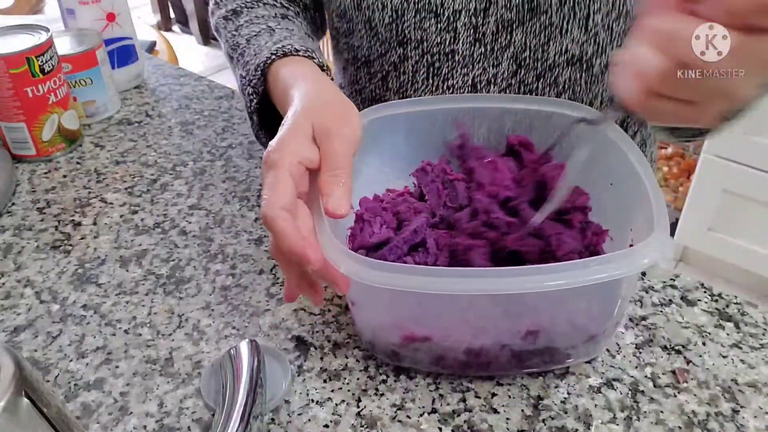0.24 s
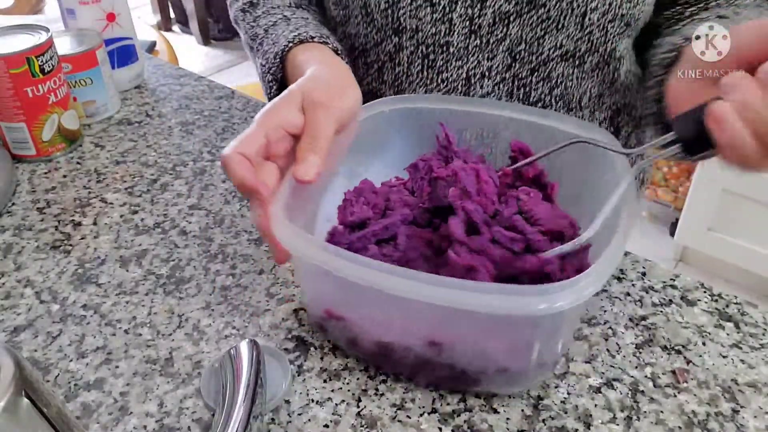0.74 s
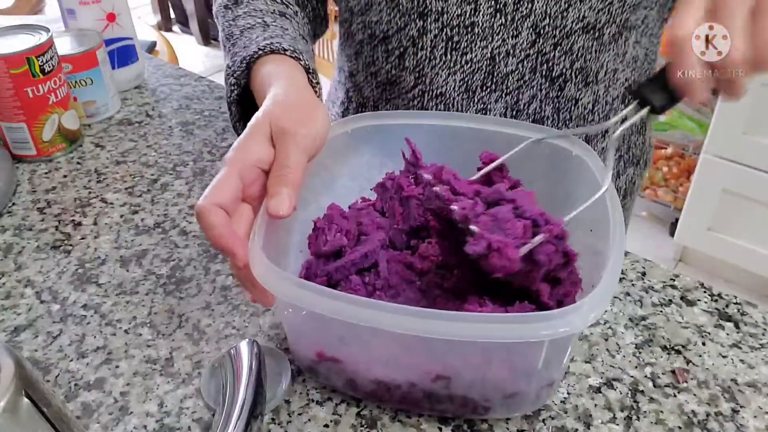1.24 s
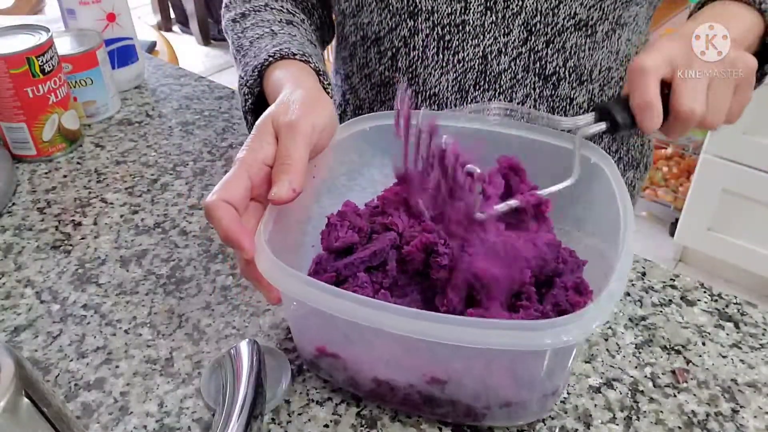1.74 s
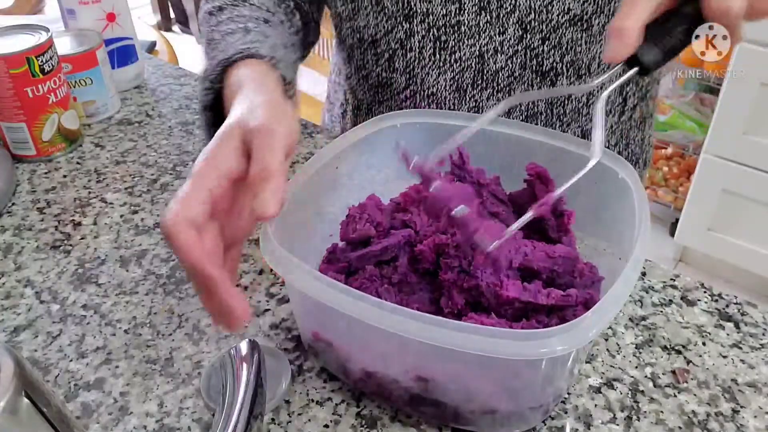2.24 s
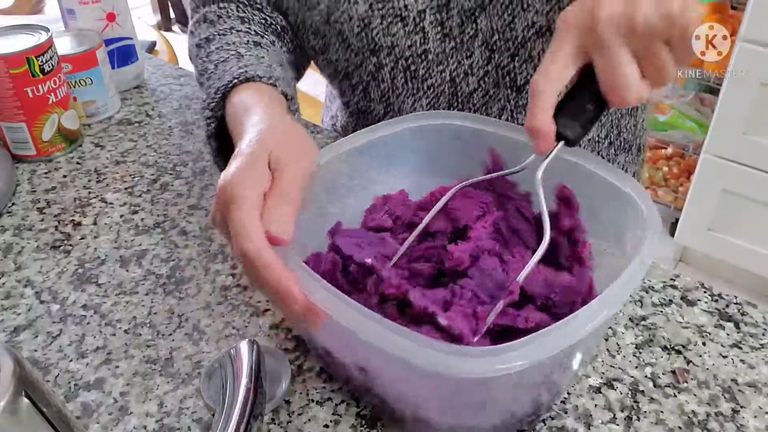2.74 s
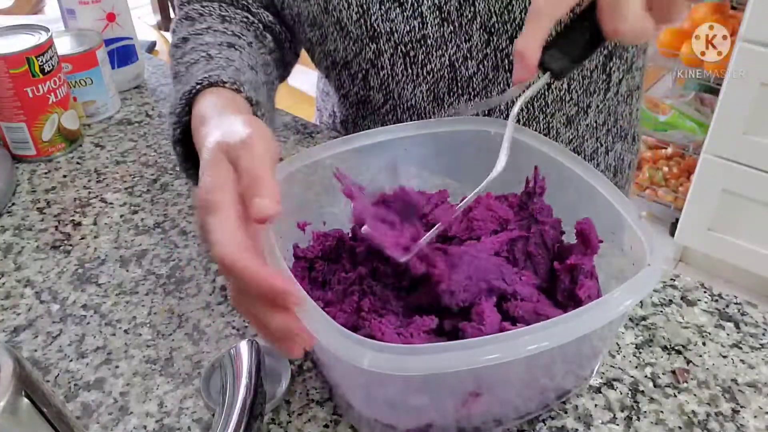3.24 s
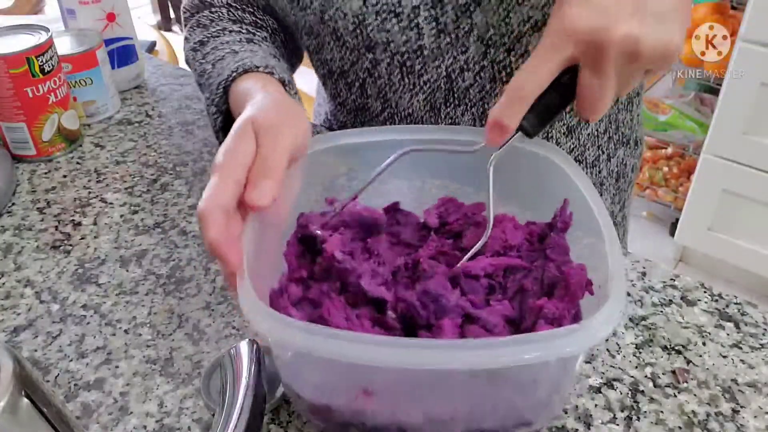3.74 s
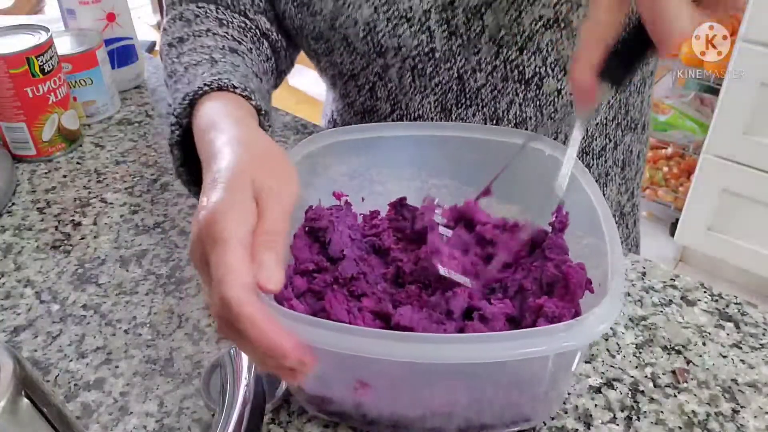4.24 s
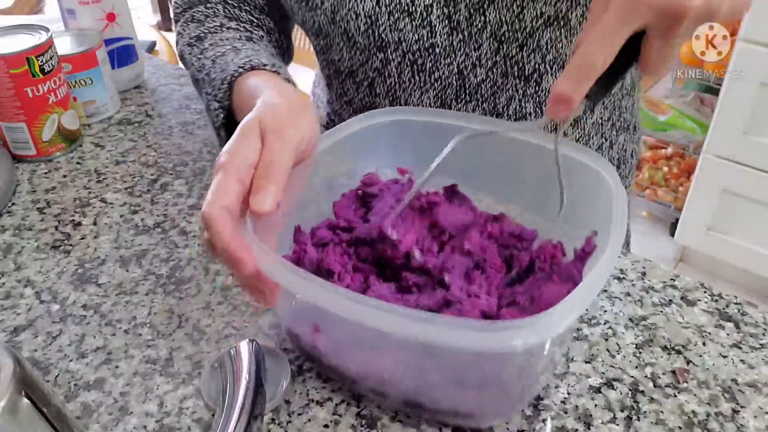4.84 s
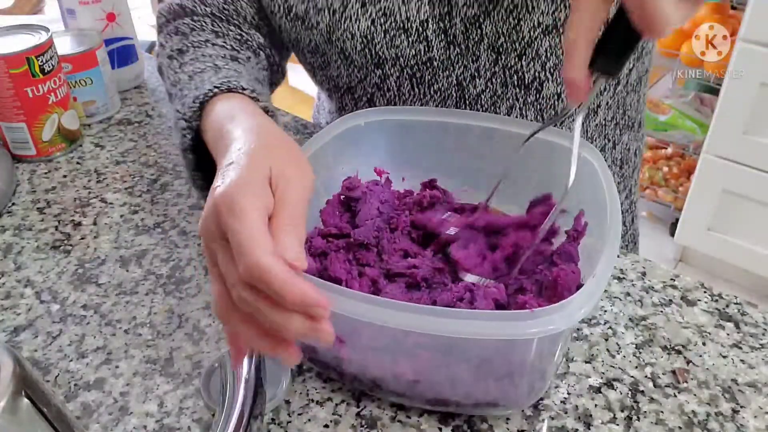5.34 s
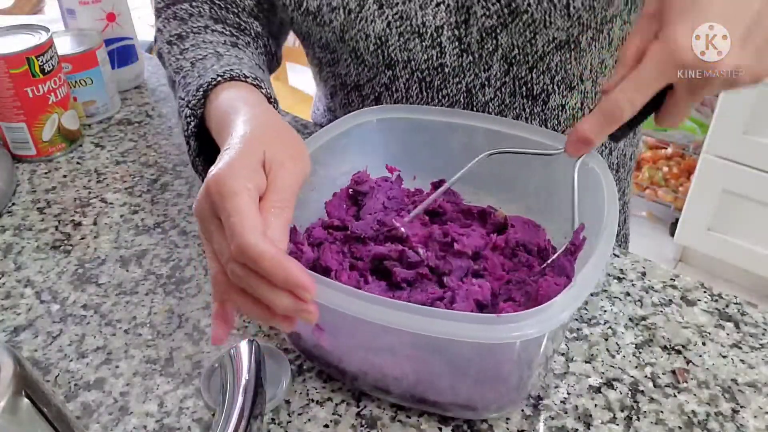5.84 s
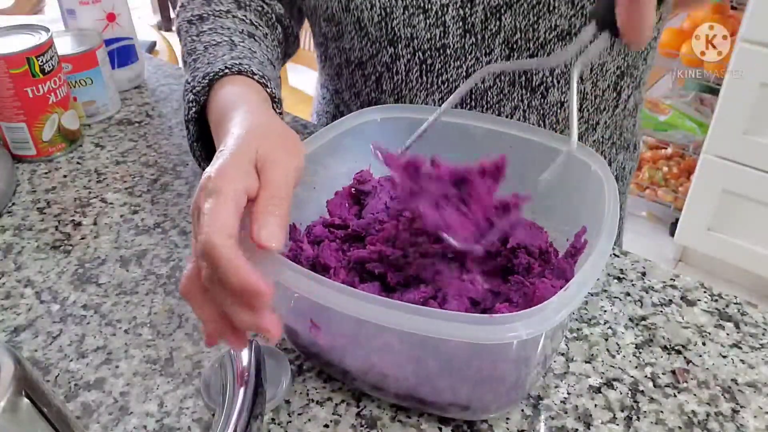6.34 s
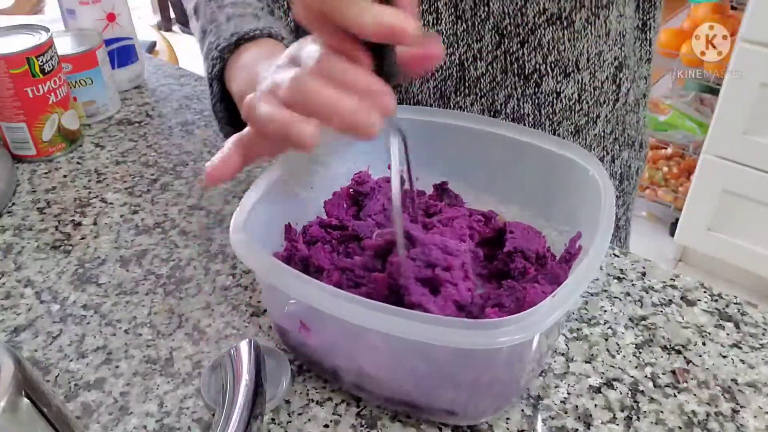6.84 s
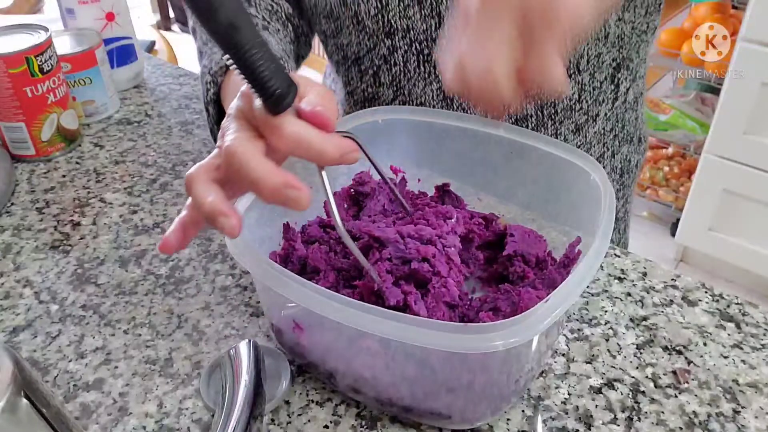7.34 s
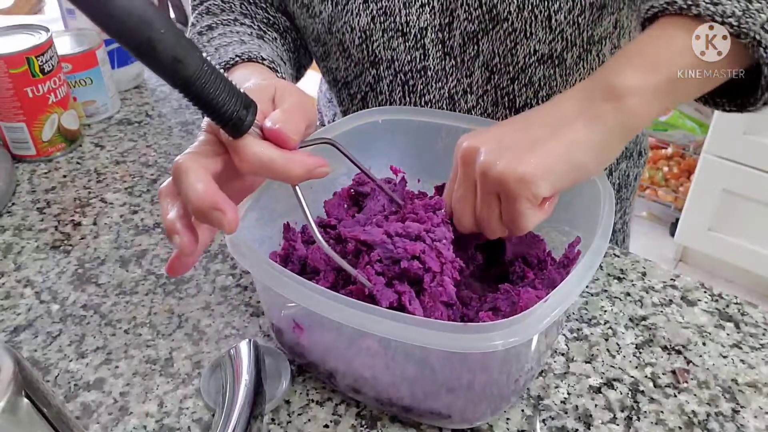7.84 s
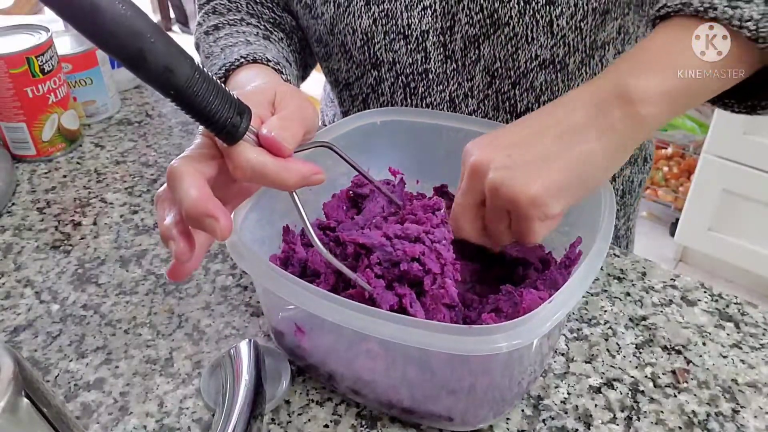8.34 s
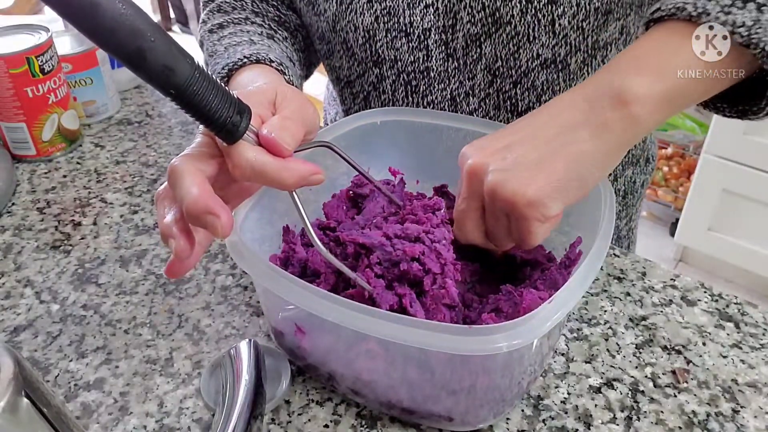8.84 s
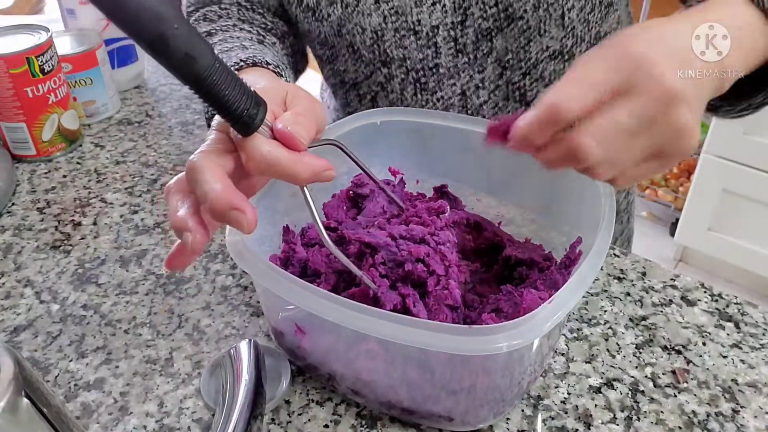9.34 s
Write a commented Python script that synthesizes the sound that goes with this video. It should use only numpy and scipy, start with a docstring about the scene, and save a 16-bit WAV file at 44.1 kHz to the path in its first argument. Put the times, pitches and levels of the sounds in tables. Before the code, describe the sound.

A wire masher scrapes and squashes sticky mash in a plastic tub, with hollow knocks on a stone counter, then thins to near quiet.

```python
"""Scrapes, wet squashes and hollow knocks: a wire masher works soft yam in a plastic tub on a stone counter.
Friction and sticky hiss are shaped noise that swells with each stroke; wet ticks are brief noise bursts.
Knocks excite decaying modes of the tub walls, the air in the tub and the counter, heard close to a phone.
Behind lie the reverberation, air and hum of a quiet kitchen, and a faint dull tock once a second."""
import sys
import numpy as np
from scipy import signal
from scipy.fft import rfft, irfft, next_fast_len
from scipy.io import wavfile
from scipy.ndimage import uniform_filter1d

SR = 44100
rng = np.random.default_rng(int(sys.argv[2]) if len(sys.argv) > 2 else 0)


def int16_out(signal):
    """Quantize to a 16-bit WAV file."""
    q = np.round(np.clip(np.atleast_2d(signal).T, -1, 1) * 32767)
    wavfile.write(sys.argv[1], SR, q.astype(np.int16))


N = 422478  # length in samples

# modes of the tub walls, damped by mash and hand: pitch_hz, relative level_db, t60_s
TUB_MODES = [(312, -18, 0.065), (450, -11, 0.026), (527.3, -5.5, 0.03), (715, -5, 0.013),
             (729.5, -2.5, 0.033), (851.7, -5.5, 0.024), (1101, -4, 0.1), (1256, 1.5, 0.011),
             (1757, -13, 0.041), (1970, -11.5, 0.079), (2240, -8, 0.043), (2480, -10, 0.025),
             (2820, -11.5, .025), (3100, -12.5, .025), (4330, -21.5, .02)]


def gain_of(db):
    """Level to amplitude: 20 dB is a factor of ten."""
    return 10 ** (np.asarray(db) / 20)


def evened(x):
    """Normalization by mean power: the result has rms 1."""
    return x / np.sqrt(np.mean(x ** 2) + 1e-20)


def read(points, hz):
    """Interpolation of a spectrum on a log-frequency axis, close to the ear's own scale."""
    point_hz, value = np.transpose(points)
    return np.interp(np.log(hz + 1), np.log(point_hz + 1), value)


def add(mix, s, sound, pan_db):
    """Superposition in the stereo pair, placed by level difference: positive pan_db favours the left."""
    part = mix[:, round(s * SR):][:, :sound.shape[-1]]
    part += sound[..., :part.shape[1]] * gain_of([[pan_db / 2], [-pan_db / 2]])


def noise(shape, patchy_db, flicker_db, size, count):
    """Random-phase synthesis: partly coherent stereo noise with lasting patches and a flicker of all bins."""
    # likeness of the two channels: pitch_hz, coherence (0 to 1)
    likeness = [(60, 0.93), (150, 1), (300, 0.9), (1000, 0.25), (4000, 0.13), (15000, 0.21)]
    # channel balance: pitch_hz, left_over_right_db
    balance = [(60, -3.5), (180, 5), (550, -3.5), (1650, 1), (4970, 0.5), (15000, 3)]
    frames, hz = N * 4 // size + 5, np.fft.rfftfreq(size, 1 / SR)
    a, b, c, d, patches = rng.standard_normal((frames, len(hz), 5)).T
    patches = uniform_filter1d(patches, size=3, axis=0)  # 3 bins wide
    patches = evened(uniform_filter1d(patches, size=count, axis=1))  # count frames long
    flicker = evened(uniform_filter1d(rng.standard_normal(frames), size=3))
    same = np.clip(read(likeness, hz), -1, 1)[:, None]
    left = a + 1j * b
    right = same * left + np.sqrt(1 - same ** 2) * (c + 1j * d)
    z = np.array([left, right])
    z *= gain_of(np.array([.5, -.5])[:, None, None] * read(balance, hz)[:, None])
    z *= gain_of(read(shape, hz)[:, None] + patchy_db * patches + flicker_db * flicker)
    x = signal.istft(z, nperseg=size, noverlap=size * 3 // 4)[1][:, :N]
    return x / np.sqrt(np.mean(x.mean(0) ** 2))


def ring(hz, db, t60, detune, scatter_db, rise_s):
    """Modal decay: dying sines, each shifted a little at random in pitch and level."""
    t = np.arange(SR // 3)[:, None] / SR
    shift, size = rng.standard_normal((2, len(hz)))
    decay = gain_of(db + scatter_db * size - 60 * t / t60)
    modes = decay * np.sin(2 * np.pi * hz * (1 + detune * shift) * t)
    x = (modes * (1 - np.exp(-t / rise_s))).sum(1)
    return x / abs(x).max()


def strokes():
    """Friction noise: as each stroke swells, holds and dies, every rubbing part follows at its own level."""
    # strokes through the mash: full_pressure_s, rise_s (over 30 dB, sign ignored), hold_s, fall_s (likewise),
    # wire rub_db, bright_over_rub_db, tub hollow_db, tub drag_db, mash hiss_db
    stroke_rows = [(0.037, 12, .14, 0.15, -57.5, -2, -64, -62.5, -59),
                   (0.37, 4, 0.1, 2, -86, 9, -82, -75.5, -68),
                   (0.533, 0.18, .27, 0.16, -60.5, 2, -63, -66.5, -60.5),
                   (0.939, 0.43, 0.23, 0.08, -62, 0.8, -64.5, -61.5, -63),
                   (1.403, 0.2, .11, 0.1148, -57, 0, -52, -48, -61),
                   (1.82, -0.01, .11, 0.24, -51, -4.5, -47, -49.5, -67),
                   (2.091, 0.28, 0.048, 0.21, -74.5, 4, -69, -63.5, -67),
                   (2.632, 0.3, .01, 1.3, -94, 10, -87, -75, -68),
                   (2.676, 0.04, 0.22, -0.03, -57, 3.5, -58.5, -62.5, -50),
                   (2.914, 0.12, 0.11, 0.11, -52, 1.1, -53.5, -53.5, -52),
                   (3.096, 0.24, 0.011, 0.22, -67, 2.5, -66.5, -60, -66.5),
                   (3.434, 0.05, 0.079, 0.9, -70, 3.5, -71, -66, -64.5),
                   (3.646, 0.12, 0.083, 0.13, -56, 3.5, -53.5, -63, -52),
                   (3.729, 0.0239, .04, 0.17, -46.5, -1, -48.5, -64, -46),
                   (3.829, 0.09, 0.068, 0.11, -55, 1.5, -56.5, -58.5, -52),
                   (4.174, 0, 0.017, -0.1, -65, -15, -73, -67.5, -67),
                   (4.246, 0.08, .03, -0.2, -59.5, -2.5, -70, -54.5, -60.5),
                   (4.346, 0.16, 0.088, 0.14, -62, 2.5, -60, -64.5, -57),
                   (4.594, 0.24, 0.056, 0.49, -54.5, 1.5, -53, -63, -49),
                   (4.938, 0.43, 0.064, 0.25, -55, 2.2, -55.5, -58.5, -52.5),
                   (5.285, -0.02, 0.035, 0.2, -54, -4, -69, -46.5, -63),
                   (5.46, 0.24, 0.098, 0.52, -77.5, 9.5, -84, -71, -61),
                   (5.589, 0.1, 0.055, 0.17, -60, 5, -57.5, -64.5, -57.5),
                   (5.818, .05, 0.12, 0.36, -90, 13, -87, -86, -67.5),
                   (5.961, 0.06, 0.048, 0.34, -63, 3.5, -60.5, -54, -59),
                   (6.186, -2.4, .01, 0.2, -70, -5, -77, -66, -72.5),
                   (6.36, 2.5, .02, 0.23, -91.5, 6, -92.5, -78.5, -71.5),
                   (6.84, 0.36, .01, 0.95, -87, 5.5, -79.5, -65.5, -69),
                   (6.89, 0.09, 0.071, 0.21, -64.5, 4.5, -63.5, -64, -58),
                   (7.019, 0.13, 0.034, 0.12, -71, 2.5, -70, -79, -64.5),
                   (7.19, -0.6, 0.011, .11, -79, -6.5, -78, -73.5, -78.5),
                   (7.715, 0.14, 0.17, 0.4, -87.5, -0.3, -77, -72, -86),
                   (8.01, 0.1, .03, 0.12, -82.5, 4, -79, -82, -62.5),
                   (8.038, 0.05, 0.031, 0.33, -75.5, 7.5, -69, -73, -61.5),
                   (8.169, 0, 0.021, 0.1, -71, -9, -70.5, -78.5, -93),
                   (8.372, 0.16, 0.14, 0.53, -85, 1, -78.5, -67, -81.5),
                   (9.159, 0.25, 0.021, 0.16, -84.5, -1.5, -84, -74, -83),
                   (9.441, 0.12, .2, .1, -66, 6, -78.5, -73.5, -56)]
    # spectra, each: pitch_hz, relative density_db
    rub_shape = [(850, -37.5), (1450, -5), (1570, -0.5), (1700, -2.5), (1970, -1), (2260, -4), (2600, -9),
                 (3380, -37), (5720, -120)]  # wire rubbing the wall
    bright_shape = [(1530, -32), (2600, 2.5), (3920, 3), (4260, -2.5), (4640, 1.5), (5370, -8.5),
                    (6500, -6.5), (8450, -32.5), (14300, -120)]  # upper part of the rub
    hollow_shape = [(500, -44), (850, -9.5), (921, -14), (994, -5.5), (1070, 0), (1220, -5), (1300, -6),
                    (1450, -14), (1880, -44.5), (3190, -120)]  # hollow of the tub
    drag_shape = [(88, -34.5), (150, 0), (252, -6.5), (356, 1), (394, -8), (425, -7), (575, 4), (950, -11),
                  (1240, -40.5), (2090, -120)]  # tub dragged on the counter
    hiss_shape = [(1760, -31.5), (3000, -9.5), (3910, -9), (4260, -3.5), (6130, -2), (8340, -6),
                  (14900, -4), (15600, -20), (16000, -12)]  # sticky mash
    shake_shape = [(15, -42), (25, -20.5), (40, -2.5), (59, 2), (118, 3), (182, -9), (251, -11), (300, -8),
                   (390, -36), (660, -120)]  # counter shaken by the drag
    shake_over_drag_db = -0.5
    rest_drag_db, rest_shake_db = -78, -65  # low murmur and rumble that stay between strokes

    s, rise, hold, fall, rub_db, bright_db, *other_db = np.transpose(stroke_rows)
    t = np.arange(0, N + 96, 96)[:, None] / SR  # control points 96 samples apart
    before = np.maximum((s - t) / abs(rise), 0)
    after = np.maximum((t - s - hold) / abs(fall), 0)
    stroke_power = gain_of(-30 * (before + after)) ** 2
    part_power = gain_of([rub_db, rub_db + bright_db, *other_db]).T ** 2
    power = stroke_power @ part_power  # overlapping strokes add in power
    rub, bright, hollow, drag, hiss = (np.interp(np.arange(N) / SR, t[:, 0], np.sqrt(p)) for p in power.T)
    shake = np.hypot(gain_of(shake_over_drag_db) * drag, gain_of(rest_shake_db))
    drag = np.hypot(drag, gain_of(rest_drag_db))

    out = rub * noise(rub_shape, patchy_db=2.5, flicker_db=2.0, size=512, count=14)
    out += bright * noise(bright_shape, patchy_db=1.9, flicker_db=1.5, size=256, count=20)
    out *= grain(depth_db=0.85, count=90)
    out += hollow * noise(hollow_shape, patchy_db=1.0, flicker_db=0.8, size=512, count=20)
    out += drag * noise(drag_shape, patchy_db=3.5, flicker_db=1.2, size=512, count=12)
    hiss = hiss * grain(depth_db=1.26, count=50)
    out += hiss * noise(hiss_shape, patchy_db=1.5, flicker_db=0.9, size=128, count=40)
    return out + shake * noise(shake_shape, patchy_db=2.25, flicker_db=2.5, size=2048, count=5)


def grain(depth_db, count):
    """Intermittent yielding: brief surges as lumps of mash give way, smoothed over count samples."""
    surges = np.minimum(rng.exponential(1, N), 7) ** 3 - 6  # the cube makes large surges rare
    return gain_of(depth_db * evened(uniform_filter1d(surges, size=count)))


def knocks():
    """Impact excitation: a short push cracks and rings the walls, then clatter and the counter's boom follow."""
    # knocks: start_s, blow_db, boom_db, struck_centre_hz, clatter_db, clatter brightness_db_per_octave,
    # hollow_db, weight on the higher counter modes_db_per_octave, left_over_right_db (halved for clatter,
    # none for boom)
    knock_rows = [(0.241, -40, -75, 1140, -65, 4, -69, 0, 2),
                  (0.889, -35.5, -47, 486, -59.5, 3.5, -74, 1, 1),
                  (0.93, -42, -60, 720, -55.5, 4, -70, 2.5, 4),
                  (1.003, -42.5, -59, 740, -56, 2, -64, -6, 2.5),
                  (1.177, -39.5, -42, 743, -55.5, -2.5, -74, 0, -2.5),
                  (1.33, -46, -73, 1100, -56.5, -0.5, -51, 2.5, 6),
                  (1.426, -30.5, -43, 566, -53, 1.5, -64, 3, -1.5),
                  (1.457, -31.5, -53.5, 439, -50, 0, -50, 2, 3),
                  (1.498, -28, -45, 503, -55, -7, -56, 1.5, 1.5),
                  (1.81, -8, -16, 650, -26, -1.5, -22, -0.75, 2.5),
                  (2.535, -65, -47.5, 301, -78, -6, -98, 2.5, -3.5),
                  (2.912, -28.5, -39, 711, -44.5, 4, -51, 3.5, 0),
                  (2.949, -33.5, -57, 1090, -50, 1, -66, 11, -.6),
                  (3.092, -42.5, -57.5, 675, -63, 8, -74, -2, -2.5),
                  (3.416, -39.5, -46.5, 1070, -58, -8, -57, 2, .3),
                  (3.726, -29.5, -32.5, 740, -59.5, -5, -61, 8, 2.5),
                  (3.763, -41, -46, 1220, -52.5, 0, -64, 7, -1.5),
                  (3.827, -39.5, -55, 1860, -52.5, 3, -65, 5, 3),
                  (3.978, -45, -69, 686, -62, -6, -74, 6, .3),
                  (4.243, -32.5, -52.5, 568, -52.5, -2, -72, -3, -4),
                  (4.549, -53, -55, 1080, -53, 3.5, -54, -4, 3),
                  (4.943, -39, -64, 725, -66, -8, -57, -4, 0),
                  (5.288, -18, -39, 486, -43.5, 1, -62, -1, -1.5),
                  (5.304, -35, -29, 687, -47, -5, -59, 2.5, -1.5),
                  (5.95, -34, -44, 490, -54.5, -9, -67, 7, -2.5),
                  (6.79, -62, -58.5, 304, -80, -10, -87.5, 6, 1),
                  (6.836, -51, -57, 301, -56.5, -13, -64, 7, -1.5),
                  (6.924, -47, -63, 1080, -57, 3, -64, 4, -2.5),
                  (7.712, -41, -60.5, 725, -60, -2, -68, 2.5, 1.5),
                  (8.363, -37, -64, 730, -53, -5, -57, 5, 3.5)]
    # modes of slab and cabinet: pitch_hz, relative level_db, t60_s when unloaded
    counter_modes = [(55.5, -5, 0.65), (96.7, -1.5, 0.2), (172.4, -11.5, 0.29), (220, -18, 0.092)]
    # modes of the air in the tub: pitch_hz, relative level_db, t60_s
    cavity_modes = [(1024, -6, 0.16), (1080, -3.5, 0.27), (1159, 1, 0.18), (1187, -3.5, .22),
                    (1248, -4, .2), (1262, -6.5, 0.24)]
    contact_ms, boom_delay_s = 0.43, .009
    boom_share = .66  # the loaded counter rings this share of its free decay
    crack_per_db, crack_db = 1.3, 3  # harder blows crack more

    out, t = np.zeros((2, N)), np.arange(400) / SR
    hz, db, t60 = np.transpose(TUB_MODES)
    low_hz, low_db, low_t60 = np.transpose(counter_modes)
    push = np.exp(-.5 * (3.7 * (t * 1000 - 1.6) / contact_ms) ** 2)  # bell-shaped, peak at 1.6 ms
    crack = np.gradient(np.gradient(push))
    crack /= abs(crack).max()
    for s, blow_db, boom_db, centre, clatter_db, bright_db, hollow_db, high_db, pan_db in knock_rows:
        near_db = -5. * np.log2(hz / centre) ** 2  # favours modes near the struck centre
        walls = ring(hz, db + near_db, t60, detune=.04, scatter_db=3., rise_s=.0002)
        thud = np.convolve(walls[:4000], push)
        thud /= abs(thud).max()
        hollow = ring(*np.transpose(cavity_modes), detune=.006, scatter_db=4.0, rise_s=.012)
        boom_mode_db = low_db + high_db * np.log2(low_hz / low_hz[0])
        boom = ring(low_hz, boom_mode_db, low_t60 * boom_share, detune=.01, scatter_db=1.3, rise_s=0.0026)
        add(out, s, gain_of(crack_per_db * blow_db + crack_db) * crack, pan_db)
        add(out, s, -gain_of(blow_db) * thud, pan_db)
        add(out, s + .003, gain_of(clatter_db) * clatter(bright_db, t60=0.24), pan_db / 2)
        add(out, s, gain_of(hollow_db) * hollow, pan_db)
        add(out, s + boom_delay_s, -gain_of(boom_db) * boom, 0)
    return out


def clatter(bright_db, t60):
    """Resonant filtering: the tub shudders on the stone as dying noise, partly unlike left and right."""
    t, f = np.arange(8192) / SR, np.fft.rfftfreq(8192, 1 / SR)
    a, b = rng.standard_normal((2, len(t))) * gain_of(-60 * t / t60) * (1 - np.exp(-t / 0.00063))
    hz, db, ring_s = np.transpose(TUB_MODES)[:, :, None]
    walls = (gain_of(db) / (1 + 1j * (f - hz) * ring_s / 1.4)).sum(0)  # half width in Hz = 1.4 / ring_s
    slope = gain_of(bright_db * np.log2(np.maximum(f, 400) / 700))
    low_cut = f ** 4 / (f ** 4 + 300. ** 4)
    x = irfft(rfft([a + .6 * b, a - 0.72 * b]) * walls * slope * low_cut)
    return x / np.sqrt(np.mean(x.mean(0)[:900] ** 2))


def ticks():
    """Sudden release: band-passed noise bursts, heard as wet ticks when the mash lets go of the wires."""
    # ticks: start_s, peak level_db, nominal centre_hz, left_over_right_db
    tick_rows = [(0.018, -48, 4250, 4), (0.234, -41, 11700, 3), (0.9328, -55, 4690, 1),
                 (1.8102, -19, 3800, 1.5), (2.5414, -54.5, 14600, 16), (2.677, -33, 4830, 1),
                 (2.677, -31, 13500, 2), (2.72, -35, 11000, 2), (2.905, -26, 14800, 12),
                 (2.9238, -26, 12250, 3), (3.0967, -35.5, 12900, 5.5), (3.441, -44.5, 14100, 8.5),
                 (3.5534, -41, 13760, 0), (3.603, -40, 12700, 7), (3.6298, -32, 14100, 9),
                 (3.645, -44, 13000, 10), (3.6548, -21, 12570, 6.5), (3.6562, -30, 4250, 3),
                 (3.7485, -22, 11300, 5), (4.021, -53, 13000, 8), (4.2434, -38, 4900, 1),
                 (4.245, -41, 12000, 4), (4.3191, -23.5, 15000, 8.5), (4.326, -32.5, 13700, 20),
                 (4.5486, -52, 6020, 4), (4.8592, -45, 4400, -6), (4.8963, -39, 7640, 3),
                 (4.942, -34, 12100, 7), (5.2886, -35.5, 10200, 18.5), (5.8222, -50, 6010, 12),
                 (6.362, -52, 9000, 8), (6.3702, -46.5, 13200, 11), (6.9251, -34, 4060, 12.5),
                 (6.927, -34, 13000, 11), (7.9952, -38, 15100, 4.5), (8.0496, -52, 7430, -11),
                 (8.746, -68, 6340, -4.5)]
    rise_s, fall_s = 0.00023, .0022  # time constants
    out, t = np.zeros((2, N)), np.arange(1500) / SR
    for s, db, hz, pan_db in tick_rows:
        band = signal.butter(1, [.7 * hz, min(1.7 * hz, 20000)], "band", fs=SR)
        burst = signal.lfilter(*band, rng.standard_normal(len(t)))
        burst *= (1 - np.exp(-t / rise_s)) * np.exp(-t / fall_s)
        add(out, s, gain_of(db) * burst / abs(burst).max(), pan_db)
    return out


def kitchen(x):
    """Reverberation: sparse taps of random sign, unlike left and right, each band dying at its own speed."""
    # decay of the room: pitch_hz, t60_s
    room_decay = [(100, 0.21), (700, 0.58), (2000, 0.44), (8000, 0.5)]
    taps = np.zeros((2, SR))
    at = np.arange(90, SR - 20, 20) + rng.integers(0, 20, (2, (SR - 91) // 20))  # one in every 20 samples
    np.put_along_axis(taps, at, rng.choice([-1., 1.], at.shape), 1)
    hz, t, z = signal.stft(taps, SR, nperseg=256)
    z = z * gain_of(-60 * t / read(room_decay, hz)[:, None])
    tail = signal.istft(z, SR, nperseg=256)[1]
    tail = signal.lfilter(*signal.butter(2, 200., "high", fs=SR), tail)
    tail /= np.linalg.norm(tail[0])
    return signal.fftconvolve(x.mean(0)[None], tail, axes=1)[:, :N]


def tocks():
    """Periodic excitation: once a second a far mechanism gives a soft, blurred tock through a small case."""
    # modes of the case: pitch_hz, relative level_db, t60_s
    case_modes = [(1050, 0, .03), (1250, -1.5, .03), (1450, -2, .03), (1700, -2, .025), (1950, -4, .025),
                  (2300, -9, .02)]
    first_s, level_db = 0.13, -75
    out, t = np.zeros((2, N)), np.arange(3000) / SR
    for s in np.arange(first_s, N / SR, 1):
        burst = rng.standard_normal(len(t)) * (rng.random(len(t)) < .04)  # about 4 % of samples are non-zero
        burst *= t * np.exp(-t / 0.026)
        case = ring(*np.transpose(case_modes), detune=0.019, scatter_db=9.0, rise_s=0.0016)
        tock = signal.oaconvolve(burst, case)
        add(out, s, gain_of(level_db) * evened(tock[:4000]), 0)
    return out


def quiet_air():
    """Broadband ambience: steady noise with the spectrum of the quiet kitchen air."""
    # spectrum: pitch_hz, relative density_db
    air_shape = [(15, -39.5), (25, -9.5), (55, -8), (87, -9.5), (120, -8), (180, -20), (206, -29),
                 (249, -5), (326, -23.5), (354, -12.5), (384, -13), (659, -26), (911, -47), (1260, -37.5),
                 (16000, -45)]
    level_db = -67
    return gain_of(level_db) * noise(air_shape, patchy_db=-0.3, flicker_db=0.5, size=1024, count=6)


def hum():
    """Narrow-band modulation: slow complex noise on a carrier gives the wavering refrigerator compressor hum."""
    # bands: pitch_hz, width_hz, level_db
    hum_bands = [(55, 2, -73), (120.2, 5, -69), (3980, 25, -98), (4370, 25, -96.5), (5080, 30, -94.5)]
    t, out = np.arange(N) / SR, np.zeros(N)
    for hz, width, db in hum_bands:
        r = np.exp(-np.pi * width / SR)
        sway = rng.standard_normal(N) + 1j * rng.standard_normal(N)
        sway = signal.lfilter([1 - r], [1, -r], sway)
        out += gain_of(db) * evened((sway * np.exp(2j * np.pi * hz * t)).real)
    return out


def scene():
    """Superposition of all sources; knocks, tocks and ticks also come back from the kitchen."""
    hits, wet = knocks() + tocks(), ticks()
    echoes = kitchen(gain_of(-11.0) * hits + gain_of(-7.0) * wet)
    return strokes() + hits + wet + echoes + quiet_air() + hum()


def record(dry):
    """Phase difference and band limits: two phone microphone ports hear each band a little apart in phase."""
    # the two ports: pitch_hz, left_lead_radians
    port_phase = [(0, 0), (110, -0.4), (300, 1.46), (1120, -1), (1810, 6), (2500, 4.5), (5080, 17.5),
                  (7060, 16.5), (13800, 30), (16200, 33)]
    low_cut_hz, edge_hz = 23, 15700
    size = next_fast_len(N)
    apart = np.interp(np.fft.rfftfreq(size, 1 / SR), *np.transpose(port_phase))
    apart = uniform_filter1d(apart, size=size // 150, mode="nearest")
    turn = np.exp(1j * np.array([[.5], [-.5]]) * apart)
    heard = irfft(rfft(dry, size) * turn, size)[:, :N]
    heard = signal.lfilter(*signal.butter(2, low_cut_hz, "high", fs=SR), heard)
    low_pass = signal.firwin(301, edge_hz, window=("kaiser", 7), fs=SR)
    return signal.oaconvolve(heard, low_pass[None], "same")


dry = scene()
out = record(dry)
int16_out(out)
```